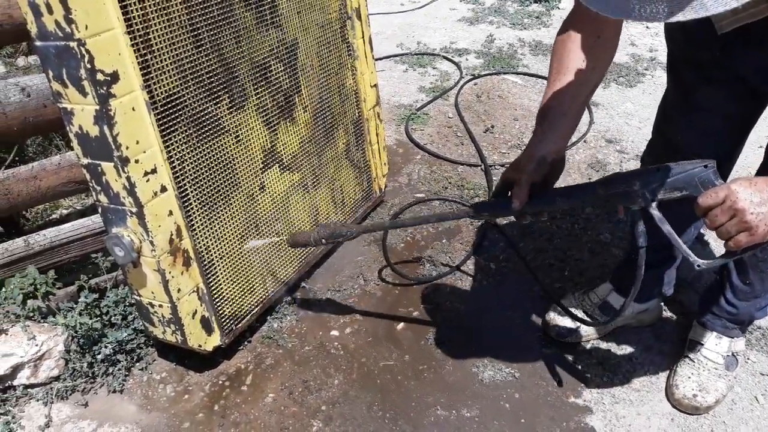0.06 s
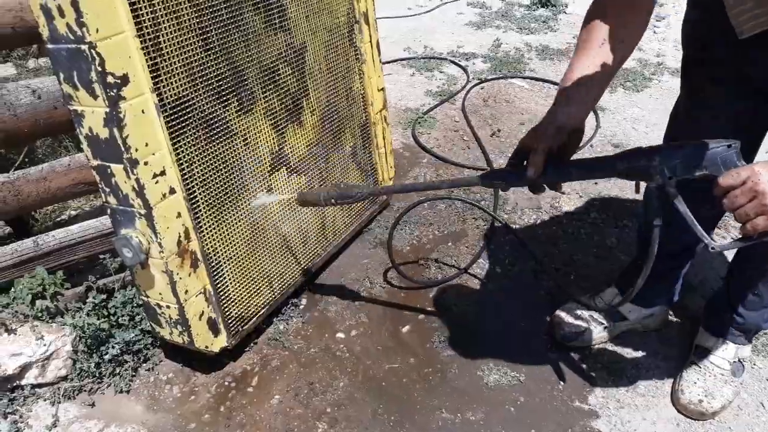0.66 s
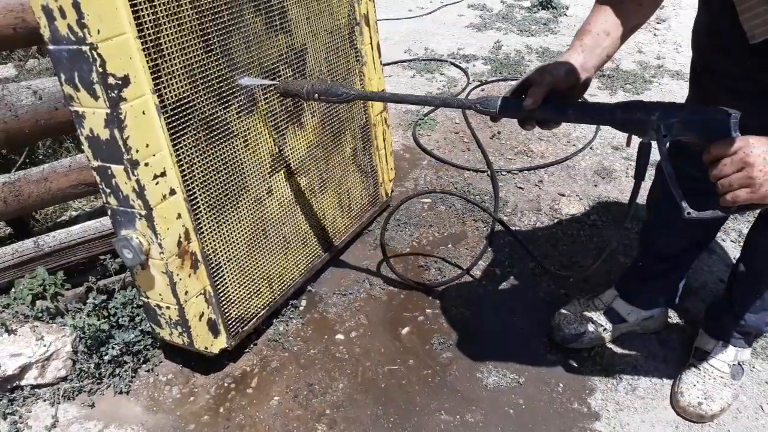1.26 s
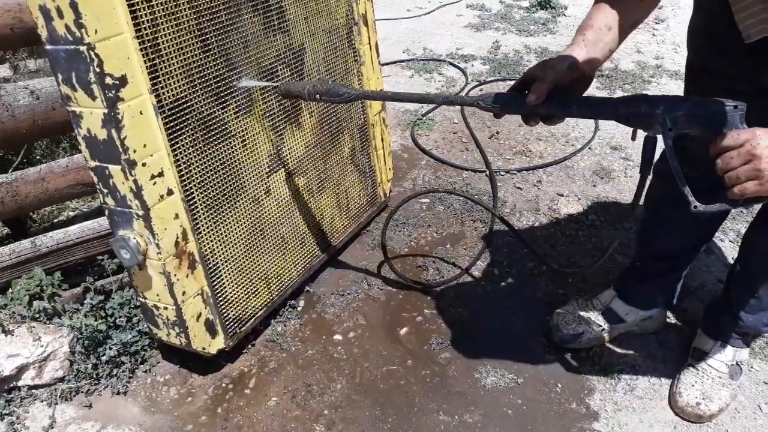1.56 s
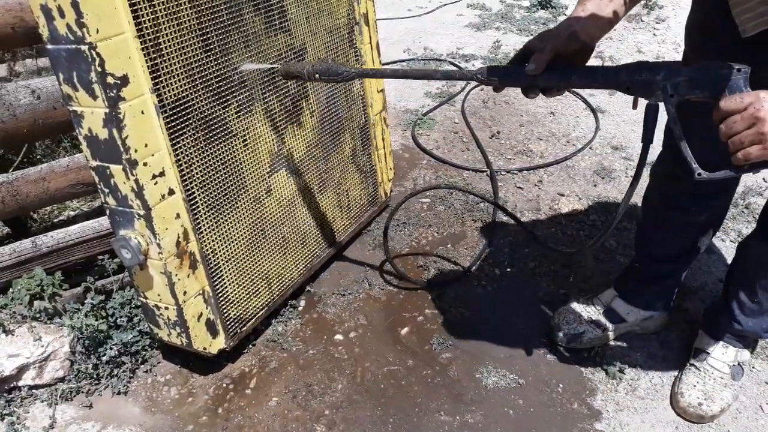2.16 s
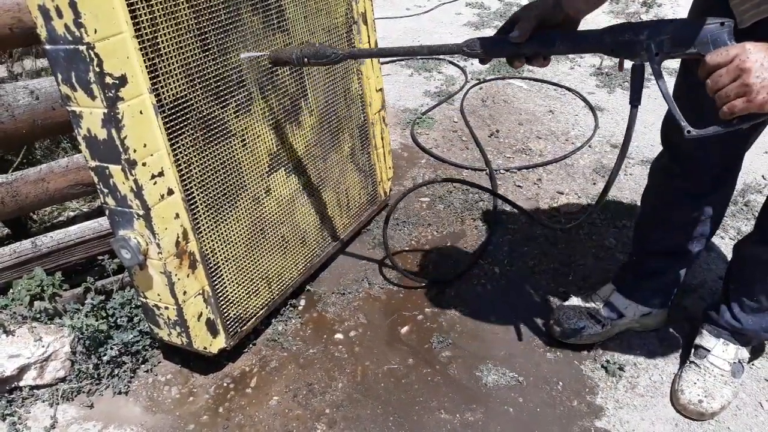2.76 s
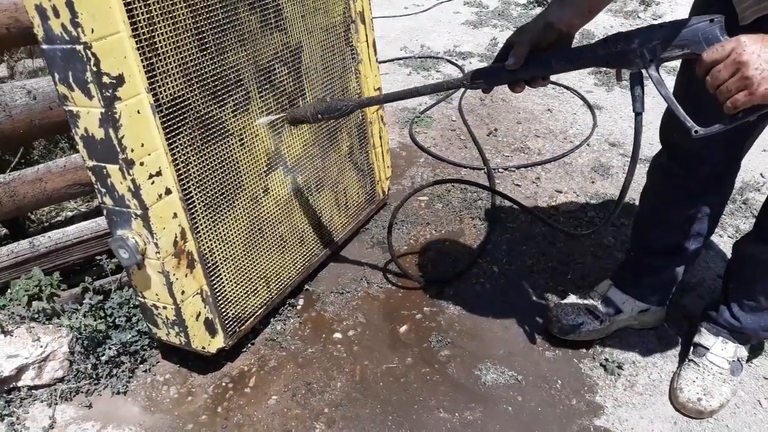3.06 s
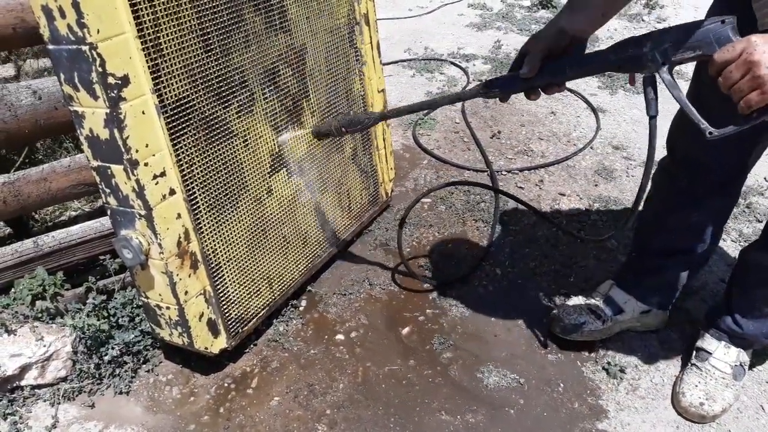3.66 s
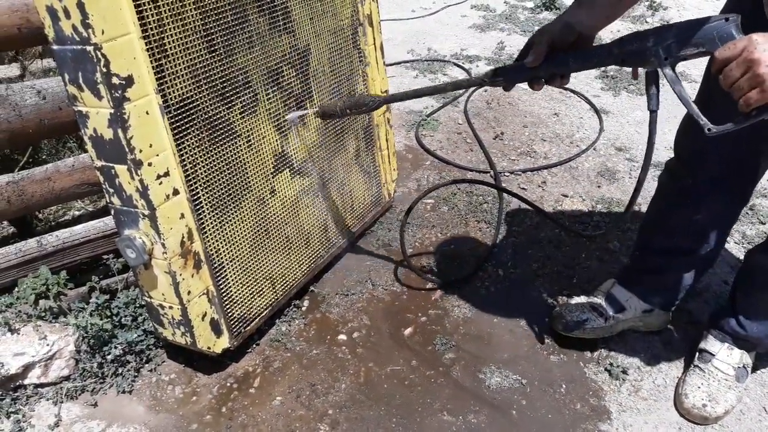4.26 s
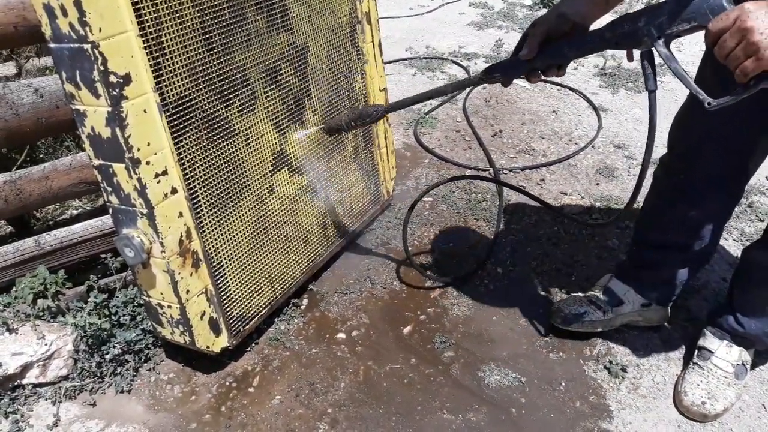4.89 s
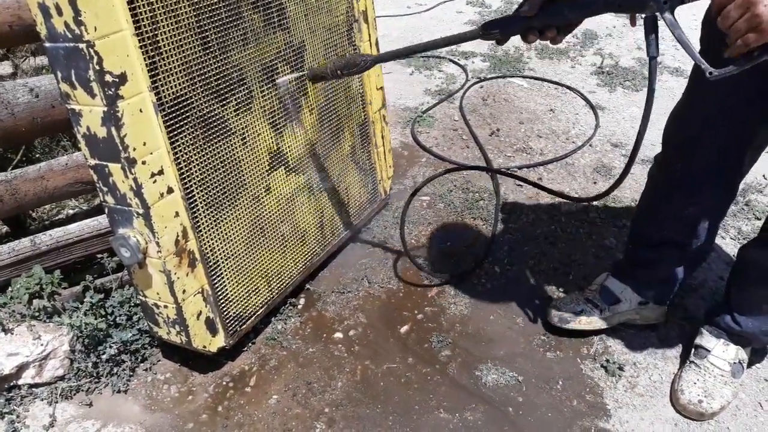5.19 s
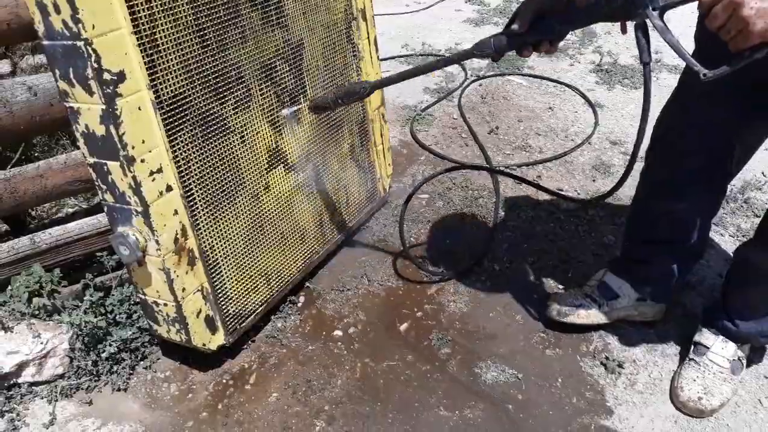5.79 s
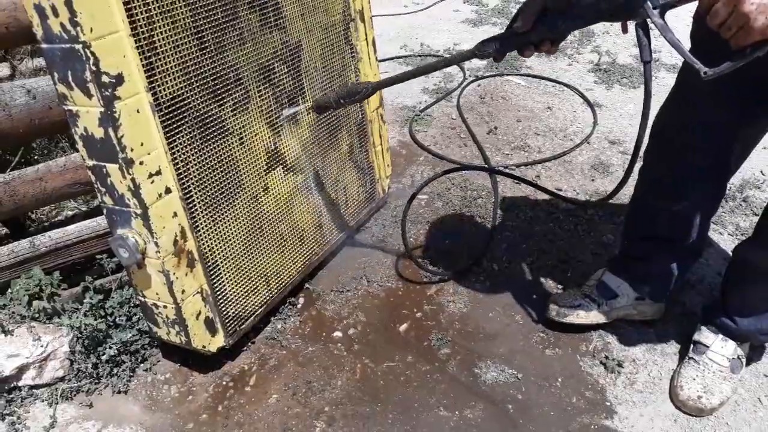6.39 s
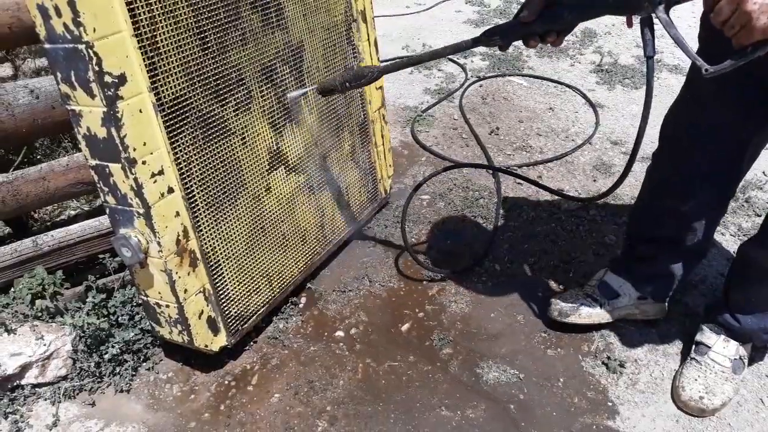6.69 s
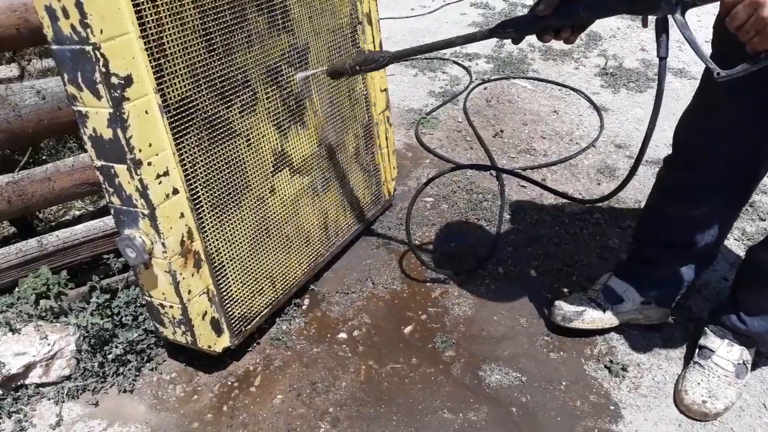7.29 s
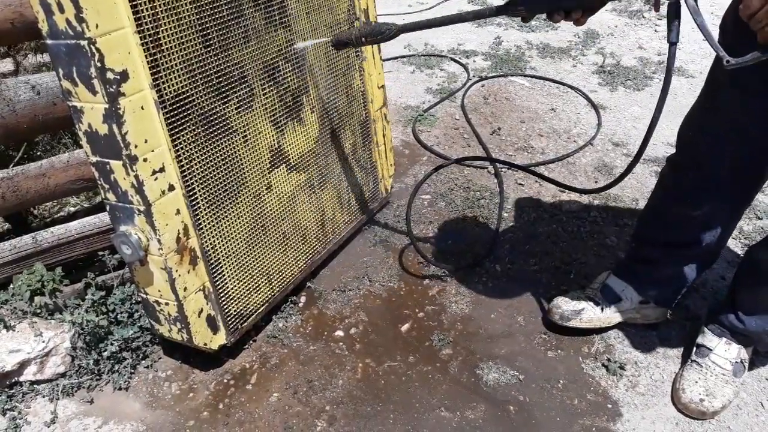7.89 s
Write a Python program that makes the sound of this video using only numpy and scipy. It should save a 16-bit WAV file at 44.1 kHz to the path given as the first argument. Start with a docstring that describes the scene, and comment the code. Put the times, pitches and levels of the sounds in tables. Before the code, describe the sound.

A jet of water hisses steadily through a radiator's grille and fins, heard close up with no echo. Beneath it, the pressure washer's electric motor drones with a low rumble and a constant high whine from the pump. The sizzling spray shifts gently in tone as the wand moves, surges briefly, and now and then catches an edge with a tiny breathy whistle. Machine and spray carry on throughout.

```python
"""Pressure washer on a radiator

The motor hums, its fan rushes, and it drives the pump through a rumbling, whining 11:50 gear pair.
The jet sweeps over the radiator: it hisses in the core, splashes through, sets the fins ringing with
every pump stroke, sizzles on the grille, breaks up into mist and now and then whistles on a fin edge."""
import sys
import numpy as np
from scipy import signal
from scipy.fft import rfft, irfft, next_fast_len
from scipy.io import wavfile

SR = 44100
rng = np.random.default_rng(int(sys.argv[2]) if len(sys.argv) > 2 else 0)


def put_to_file(sound):
    """Save the sound as 16-bit audio at rate SR, in the file named by the first command-line argument."""
    columns = np.atleast_2d(sound).T  # one column per channel
    safe = np.clip(columns, -1, 1)
    whole_steps = np.round(safe * 32767)
    wavfile.write(sys.argv[1], SR, whole_steps.astype(np.int16))


N = 354563
PINION_TEETH, WHEEL_TEETH = 11, 50

# The gears sag and recover with the load. Each row: time in seconds, tooth contacts per second.
GEAR_SPEED = [(0, 3054.5), (0.95, 3055.1), (1.4, 3051.5), (2.1, 3052.3), (3.0, 3049.5), (4.2, 3050.4),
              (4.7, 3048.5), (5.5, 3052.7), (6.3, 3054.3), (7.2, 3053.8), (7.6, 3051.8)]
# Partials of the hum; the pump's load rocks the motor, so their speeds also add.
# Each row: multiple of motor speed, multiple of pump speed, level in dB.
HUM_PARTIALS = [(0, 1, -63.2), (0, 2, -41.3), (0, 3, -49.7), (0, 4, -33.9), (0, 5, -36.0), (0, 6, -47),
                (0, 7, -40.7), (0, 8, -33.8), (0, 9, -40.0), (0, 10, -49.5), (0, 11, -39.2), (0, 12, -46.9),
                (0, 13, -38.8), (0, 14, -40.6), (0, 15, -37.8), (0, 16, -41.0), (0, 17, -48.3),
                (0, 21, -47.1), (1, -2, -49.9), (1, -1, -40.8), (1, 0, -28.9), (1, 1, -37.4), (1, 3, -45.7),
                (1, 4, -49.1), (1, 5, -43.8), (1, 7, -43.1), (1, 9, -46.2), (1, 10, -49.3), (1, 13, -48.5),
                (2, 0, -38.4), (3, 0, -37.8), (10, 0, -44.9), (13, 0, -41.1), (20, 0, -42.0)]
# Mains buzz of the motor's iron. Each row: frequency in Hz, level in dB.
MAINS_BUZZ = [(100, -54.5), (150, -47.5), (200, -53)]
# The ride of the gear whine. Each row: time in seconds, mesh tone in dB, its octave in dB.
WHINE_LEVELS = [(0, -21.7, -29), (.3, -21.2, -26.5), (.95, -24.7, -25), (1.5, -21.5, -24),
                (3.2, -20.8, -24), (3.9, -22.7, -28), (4.8, -21.7, -28), (5.6, -20.5, -24),
                (6.6, -20.7, -26), (8.04, -22.7, -29.5)]
# Tone colours of the noisy layers. Each row: frequency in Hz, relative level in dB.
FAN_EQ = [(20, -36), (60, -30), (85, -13), (130, -8), (170, -5), (350, -0.5), (600, 5.5), (850, -3),
          (1100, -11), (2000, -22), (5000, -33)]
HOUSING_EQ = [(60, -36), (120, -15.5), (155, -1), (210, 6), (350, -0.5), (470, 3), (620, 1.5), (850, 7),
              (1050, -10), (1500, -28)]
HISS_EQ = [(1500, -39), (2100, -21.5), (2400, -10), (2650, -8.5), (2850, -3), (3300, -3.5), (3900, 1),
           (4500, 1.5), (5000, -1.5), (5700, 0.5), (6900, -2.5), (7500, -2.5), (8200, -11.5), (9500, -19.5)]
SPLASH_EQ = [(300, -12), (700, -5), (1200, 0.5), (1400, -3.5), (1520, 0), (1700, -4), (2100, -7),
             (2700, -5.5), (4000, -48)]
MIST_EQ = [(7000, -23), (9700, -15), (10400, -7), (11300, -0.5), (12800, 3), (14000, -2), (15200, -3.5),
           (16000, -13)]
# The wand works slowly over the radiator.
# Each row: time in seconds, force of the jet in dB, height on the grille from 0 to 1.
WAND_PATH = [(0, -0.3, 0), (.4, 0.5, 0.4), (.8, -.3, 0.18), (1.25, 1.1, 0.57), (2.0, -0.1, 0.6),
             (2.8, 0.3, 0.74), (3.4, 0.5, 0.65), (4.15, -.8, .58), (5.2, 0.2, 0.67), (5.55, 1.5, 0.44),
             (6.4, 2.3, 0.53), (6.65, 0.8, .48), (7.1, -1.0, 0.38), (8.04, -2.0, 0.44)]
# The jet digs into the core and flares up. Each row: centre in seconds, boosts in dB for hiss,
# splash, sizzle and force, half length in seconds.
JET_SURGES = [(0.03, 2, .5, 0, -1, .045), (1.66, 0, 2.5, 0, -0.5, .055), (2.83, 2.5, 1.5, 0, 0.5, 0.059),
              (3.415, 3.9, 5.8, 0, 0.3, 0.088), (3.88, .5, .7, 4, 1.5, .03),
              (5.48, 1.7, 1.5, 2.0, -.3, .04), (6.97, .2, 0, 1.5, .1, .08)]
# At the top of each swing the sizzle ducks and the jet may lose force.
# Each row: centre in seconds, sizzle loss in dB, force loss in dB, half length in seconds.
SWING_DIPS = [(1.27, 3.5, 0, .07), (1.69, 6, -1, .07), (1.95, 2.5, .6, .06), (2.24, 7, -0.5, 0.098),
              (2.85, 5, -0.3, .11), (3.43, 8, -0.5, 0.092), (3.58, 3, 1.0, .04), (4.0, 2.5, -0.3, .06),
              (4.77, 1, 0.7, .06), (5.27, 2, 2.5, 0.064), (6.63, 3, 1.3, .09), (7.27, 5, 1.5, .07),
              (7.83, 4, 2, 0.15)]
# The jet catches a fin edge. Each row: centre in seconds, pitch in Hz, level in dB.
EDGE_WHISTLES = [(1.39, 6230, -18), (1.53, 6200, -20), (2.11, 6250, -20), (5.03, 5750, -20),
                 (5.37, 6300, -18), (5.545, 5730, -19), (6.15, 6460, -20), (6.432, 6350, -17),
                 (6.986, 6200, -19), (7.506, 6370, -17), (7.556, 6270, -20)]


def from_db(db):
    return 10 ** (np.asarray(db) / 20)


def rms_one(x):
    return x / np.sqrt(np.mean(x ** 2) + 1e-20)


def automation(rows):
    """Rows that start with a time become one curve for each further column."""
    times, *columns = np.transpose(rows)
    return [np.interp(np.arange(N) / SR, times, column) for column in columns]


def swell(centre_s, half_s):
    """A smooth bump of height 1."""
    return np.exp(-np.minimum(((np.arange(N) / SR - centre_s) / half_s) ** 2, 20))


def bumps(rows):
    """One curve of swells for each column between the centre and the half length."""
    return sum(np.outer(heights, swell(centre_s, half_s)) for centre_s, *heights, half_s in rows)


def filtered(x, gain_at):
    """Apply a gain given as a function of frequency."""
    size = next_fast_len(N + SR // 10)
    hz = np.maximum(np.fft.rfftfreq(size, 1 / SR), 1)
    return irfft(rfft(x, size) * gain_at(hz), size)[:N]


def coloured(x, eq):
    """Shape x with an EQ curve that rolls off beyond its ends; rms 1."""
    points_hz, db = np.transpose(eq)
    curve = lambda hz: from_db(np.interp(np.log(hz), np.log(points_hz), db))
    roll_off = lambda hz: np.minimum(1, hz / points_hz[0]) ** 2 * np.minimum(1, points_hz[-1] / hz) ** 2
    return rms_one(filtered(x, lambda hz: curve(hz) * roll_off(hz)))


def drift(rate_hz, size=4096):
    """A random wobble, mostly slower than rate_hz; rms 1."""
    hz = np.fft.rfftfreq(size, N / SR / size)
    slow = irfft(rfft(rng.standard_normal(size)) / (1 + (hz / rate_hz) ** 2))
    return rms_one(np.interp(np.arange(N), np.linspace(0, N, size), slow))


def resonance(drive, centre_hz, width_hz):
    """A band of the drive around a moving centre frequency; rms 1."""
    skirt = lambda hz: 1 / np.sqrt(1 + (2 * hz / width_hz) ** 4)
    angle = 2 * np.pi * np.cumsum(centre_hz) / SR
    return rms_one(sum(filtered(drive * wave, skirt) * wave for wave in (np.cos(angle), np.sin(angle))))


def motor_and_pump(pump_angle):
    """Both shafts hum over the mains buzz, and the cooling fan rushes."""
    motor_angle = pump_angle * WHEEL_TEETH / PINION_TEETH
    hum = np.zeros(N)
    for of_motor, of_pump, db in HUM_PARTIALS:
        smear = 1.66 * of_pump ** 2   # the housing delays higher orders more, blurring the strokes
        hum += from_db(db) * np.sin(of_motor * motor_angle + of_pump * pump_angle + smear)
    buzz = sum(from_db(db) * np.sin(2 * np.pi * hz * np.arange(N) / SR) for hz, db in MAINS_BUZZ)
    fan = from_db(-36.5) * coloured(rng.standard_normal(N), FAN_EQ)
    return np.sqrt(2) * (hum + buzz) + fan


def gear_rumble(pump_angle):
    """Each pair of teeth meets with its own error, shaking the housing in a looping pattern."""
    pairs = PINION_TEETH * WHEEL_TEETH
    contacts = pump_angle / (2 * np.pi) * WHEEL_TEETH
    errors = np.interp(contacts, np.arange(pairs), rng.standard_normal(pairs), period=pairs)
    return from_db(-34) * coloured(errors, HOUSING_EQ)


def stroke(angle, sharpness):
    """The load peak, of height 1, that comes once per turn of the pump shaft."""
    return np.exp(sharpness * (np.cos(angle) - 1))


def gear_whine(pump_angle):
    """Each pump stroke loads the teeth: the mesh tone and its octave swell and are briefly held back."""
    tone_db, octave_db = automation(WHINE_LEVELS)
    mesh = WHEEL_TEETH * pump_angle - .88 * stroke(pump_angle - .3, sharpness=2.3) + .04 * drift(25)
    throb = 1 + .67 * stroke(pump_angle, sharpness=6.6) + .14 * np.cos(pump_angle)
    tone = rms_one(throb * np.sin(mesh))
    octave = rms_one((.17 + stroke(pump_angle - .4, sharpness=.61)) * np.sin(2 * mesh))
    return from_db(tone_db) * tone + from_db(octave_db) * octave


def drops(per_s, spread_db):
    """Drops of uneven size hit at random moments; rms 1."""
    hits = rng.random(N) < per_s / SR
    return rms_one(hits * rng.standard_normal(N) * from_db(spread_db * rng.standard_normal(N)))


def fin_ring(pump_angle):
    """The fins ring with the pump's pressure pulses and chatter as the jet crosses them."""
    ring_hz = 6230 + 45 * drift(3)
    pulses = 1 + .11 * np.cos(pump_angle - .5)
    chatter = from_db(.9 * drift(45) + 1.5 * drift(7))
    return rms_one(pulses * chatter) * resonance(rng.standard_normal(N), ring_hz, width_hz=810)


def grille_sizzle(height, dip_db):
    """Drops sizzle on the grille: brighter near the bottom edge, darker as the level ducks."""
    centre_hz = 8140 + 900 * np.exp(-height / .13) - 67 * dip_db
    level = from_db(.8 * drift(8.9) - dip_db)
    return level * resonance(drops(per_s=22000, spread_db=3.5), centre_hz, width_hz=1210)


def jet(pump_angle):
    """Dense drops hiss, splash, ring, sizzle and end as mist; the wand's force and height ride the mix."""
    force_db, height = automation(WAND_PATH)
    sizzle_dip_db, force_dip_db = bumps(SWING_DIPS)
    hiss_boost_db, splash_boost_db, sizzle_boost_db, force_boost_db = bumps(JET_SURGES)
    force_db += force_boost_db - force_dip_db

    def fader(mid_height_db, per_force, rise_db):
        """Gain of one layer; rise_db is its change from the bottom of the grille to the top."""
        return from_db(mid_height_db + per_force * force_db + rise_db * (height - .5))

    hiss = from_db(hiss_boost_db) * coloured(drops(per_s=36000, spread_db=2.5), HISS_EQ)
    splash = from_db(splash_boost_db) * coloured(drops(per_s=15000, spread_db=1.1), SPLASH_EQ)
    fins = fin_ring(pump_angle)
    sizzle = from_db(sizzle_boost_db) * grille_sizzle(height, sizzle_dip_db)
    mist = coloured(drops(per_s=32000, spread_db=2.5), MIST_EQ)
    return (hiss * fader(-17.5, per_force=.46, rise_db=-2)
            + splash * fader(-31, per_force=.27, rise_db=-5.5)
            + fins * fader(-23.6, per_force=2, rise_db=5.5)
            + sizzle * fader(-26, per_force=.7, rise_db=-5.5)
            + mist * fader(-23.5, per_force=1.02, rise_db=.3))


def edge_whistles():
    """The jet catches a fin edge and sings a short, breathy edge tone."""
    swells = sum(from_db(db) * swell(centre_s, half_s=.022) for centre_s, _, db in EDGE_WHISTLES)
    pitch_hz, _ = automation(EDGE_WHISTLES)
    return swells * resonance(rng.standard_normal(N), pitch_hz, width_hz=240)


def scene():
    """The gears set the pace and turbulence flutters the water; both channels are the same."""
    (mesh_hz,) = automation(GEAR_SPEED)
    pump_angle = 2 * np.pi * np.cumsum(mesh_hz / WHEEL_TEETH) / SR
    machine = motor_and_pump(pump_angle) + gear_rumble(pump_angle) + gear_whine(pump_angle)
    spray = jet(pump_angle)
    turbulence = from_db(.67 * drift(50))
    mix = machine + turbulence * (spray + edge_whistles())
    return np.stack([mix, mix])


def record(dry):
    """Clip peaks at full scale, then shave off the very top with a steep low-pass."""
    cutoff_hz = 15750
    low_pass = signal.ellip(12, .1, 80, cutoff_hz, fs=SR, output="sos")
    return signal.sosfilt(low_pass, np.clip(dry, -1, 1))


dry = scene()
out = record(dry)
put_to_file(out)
```